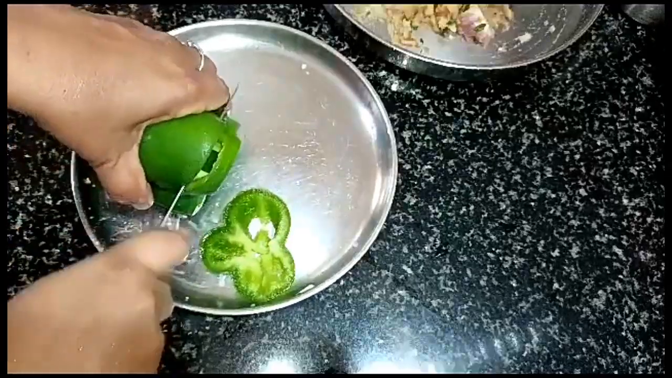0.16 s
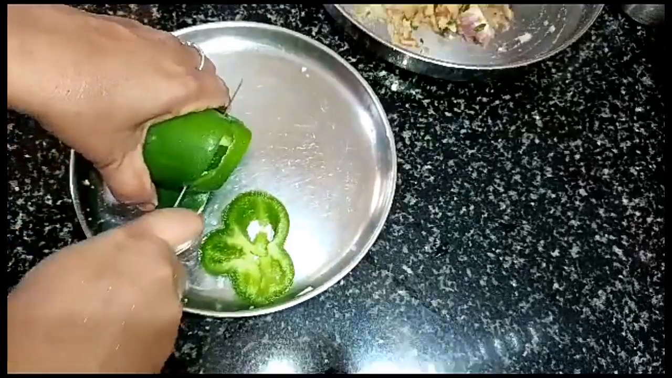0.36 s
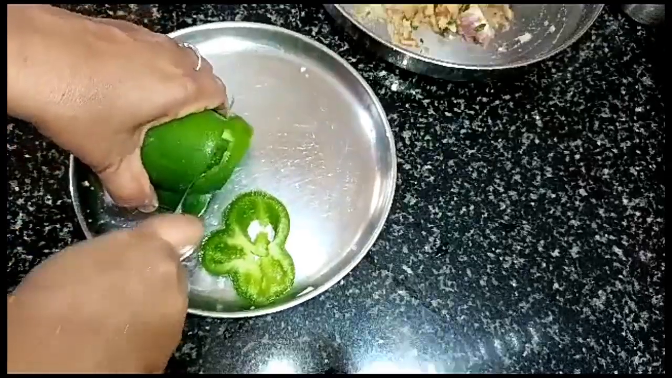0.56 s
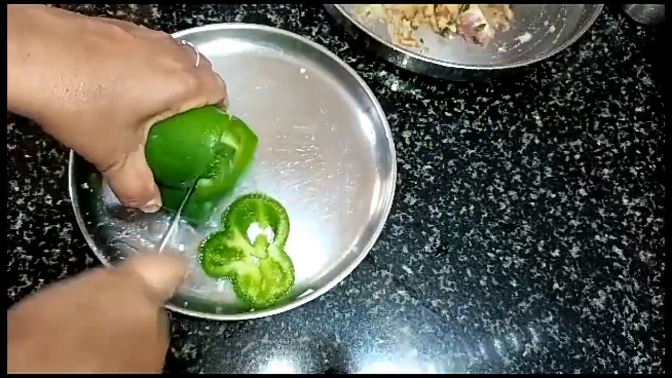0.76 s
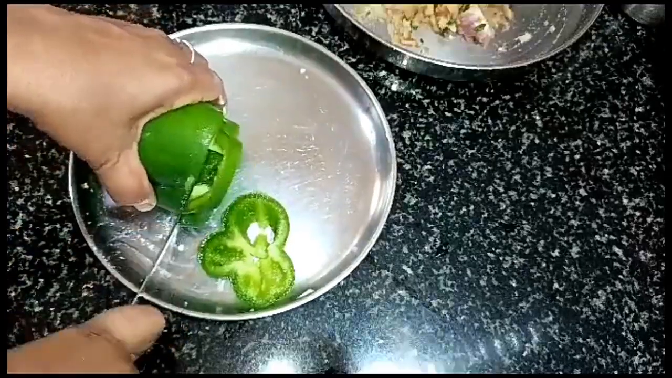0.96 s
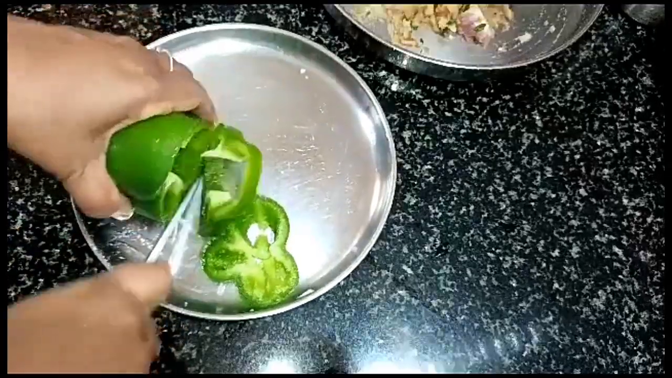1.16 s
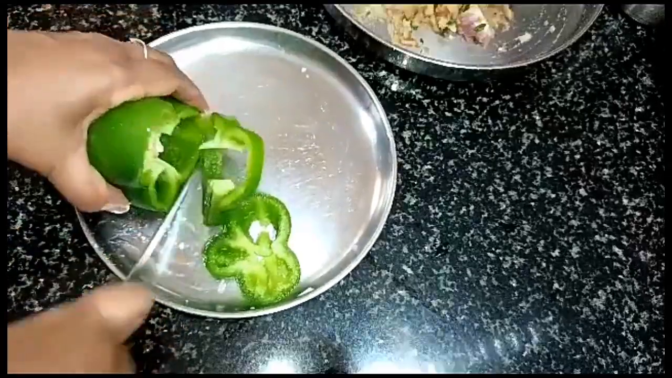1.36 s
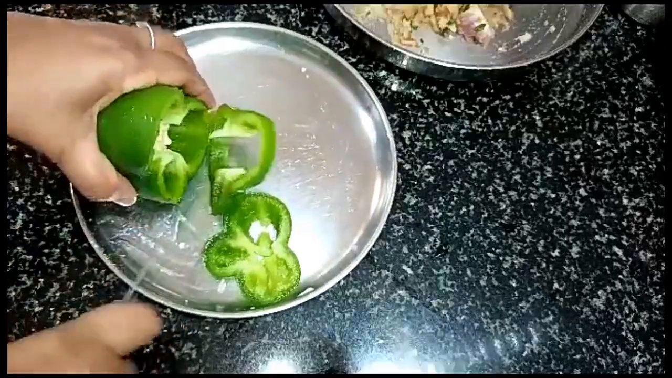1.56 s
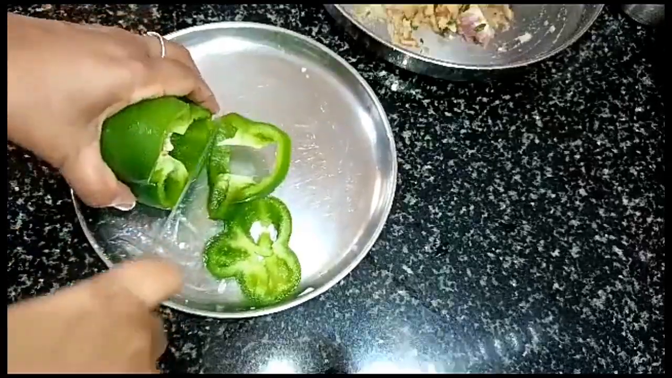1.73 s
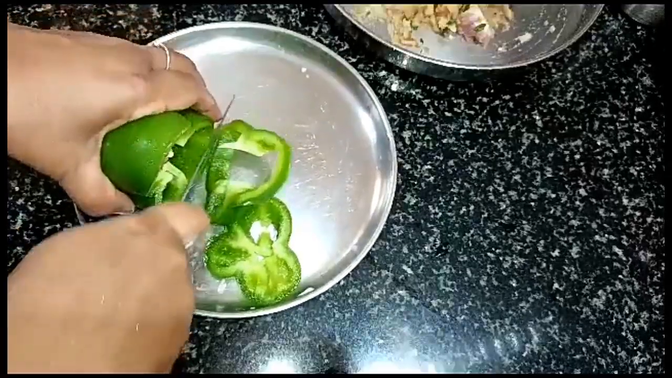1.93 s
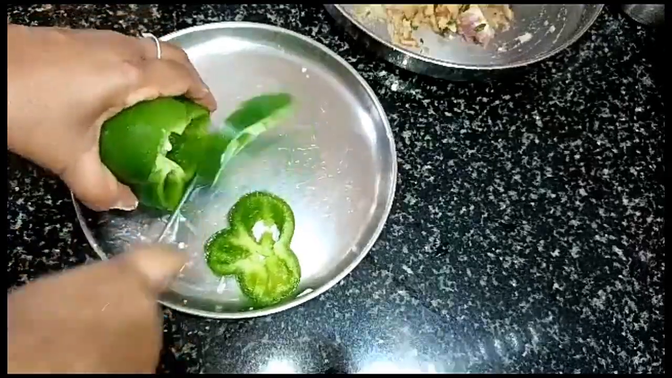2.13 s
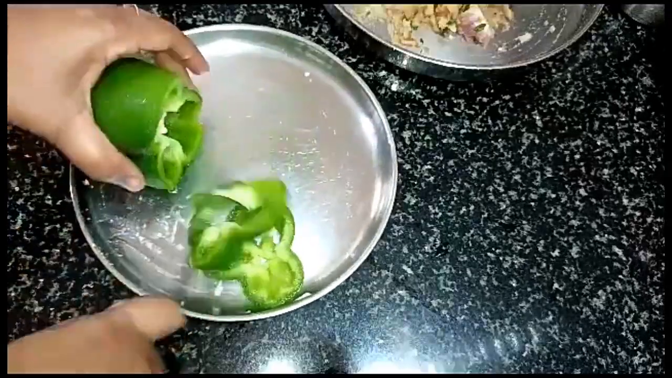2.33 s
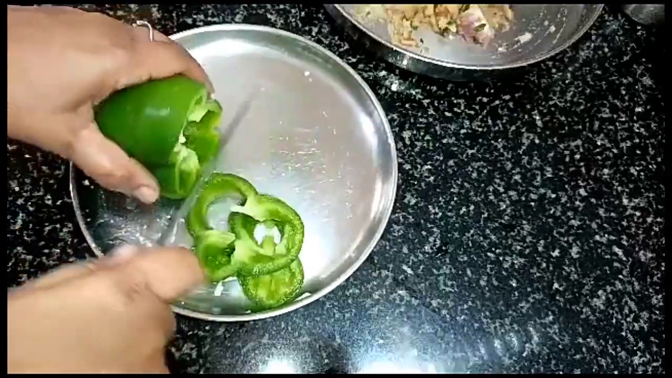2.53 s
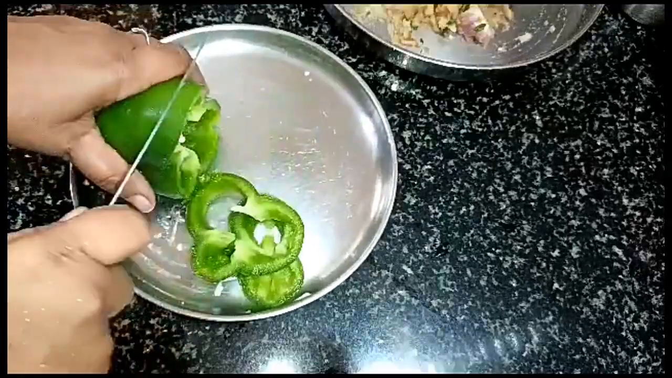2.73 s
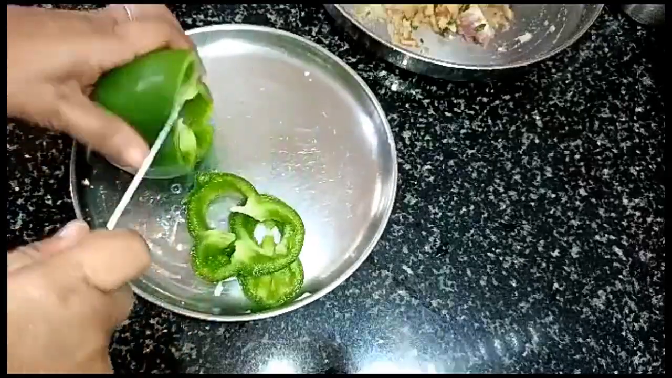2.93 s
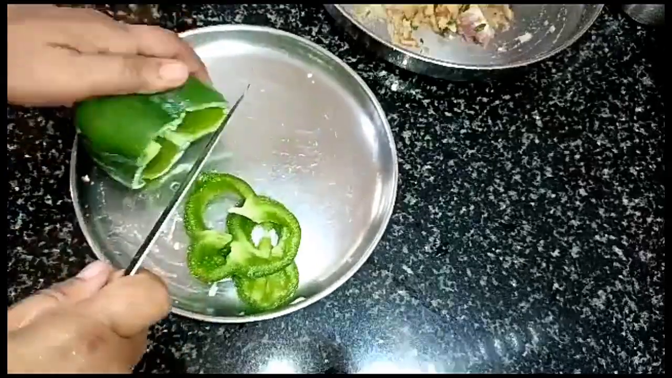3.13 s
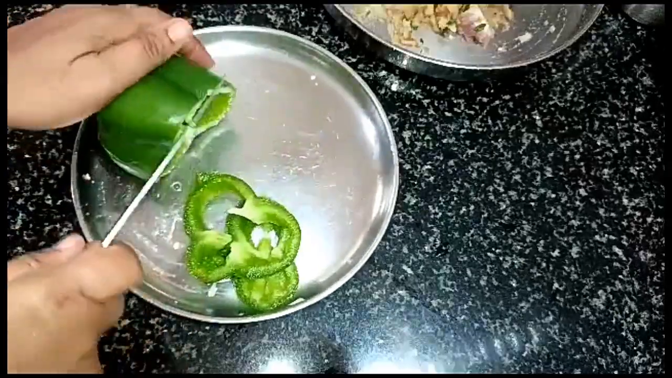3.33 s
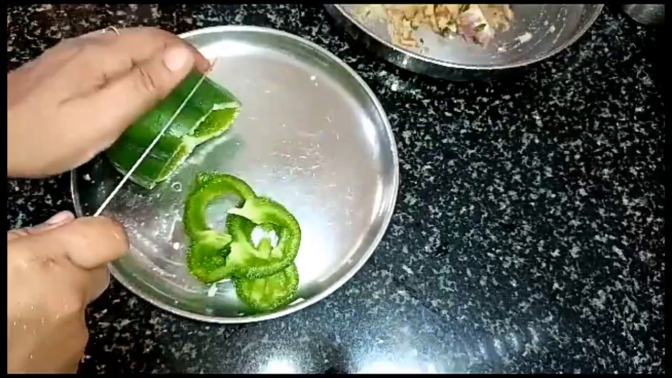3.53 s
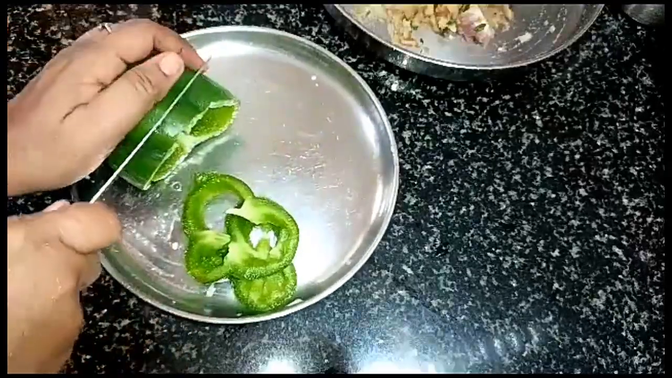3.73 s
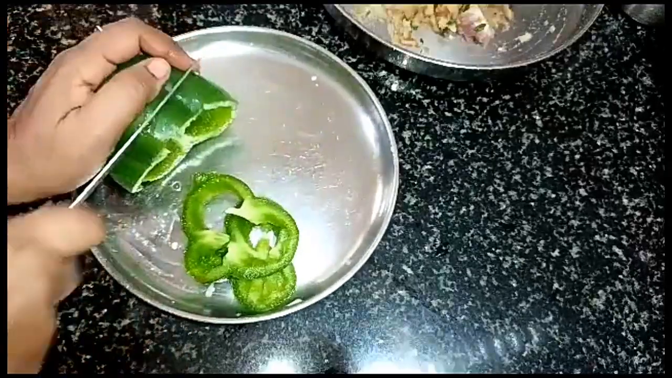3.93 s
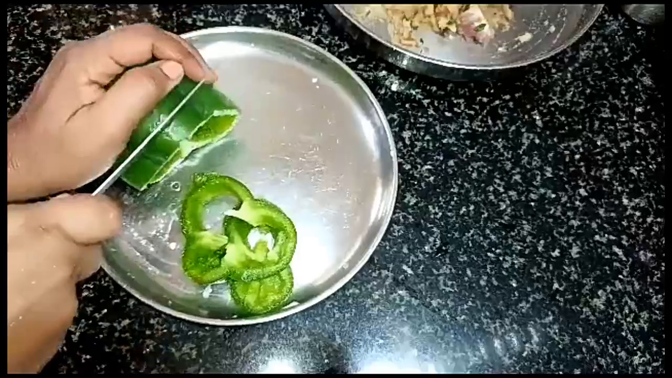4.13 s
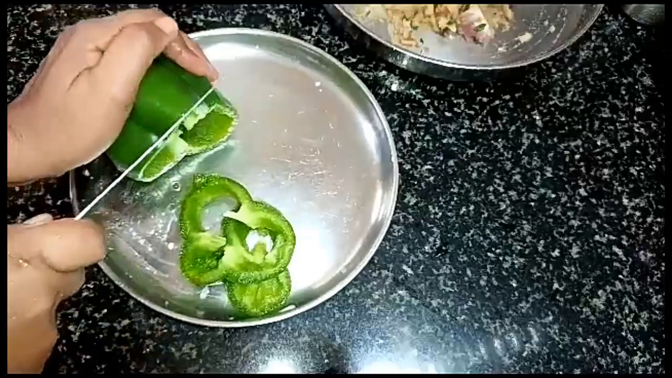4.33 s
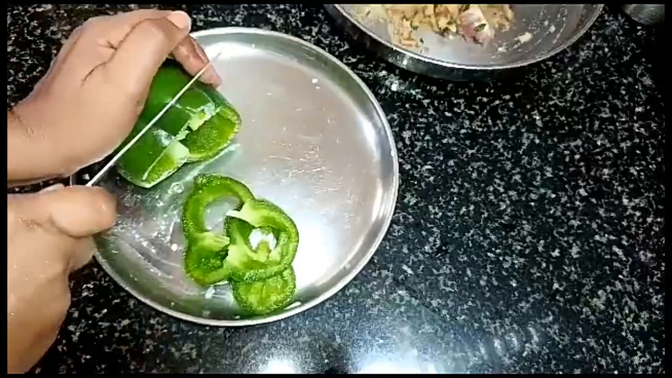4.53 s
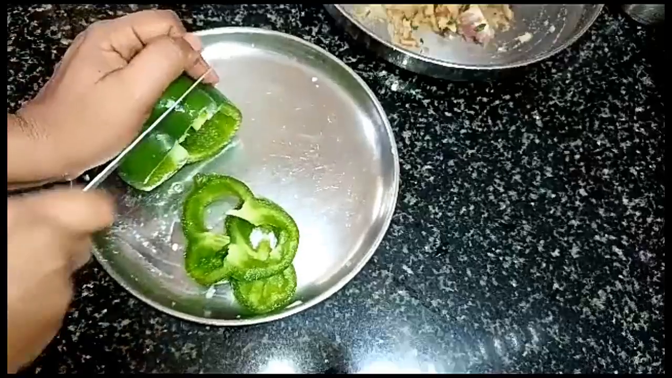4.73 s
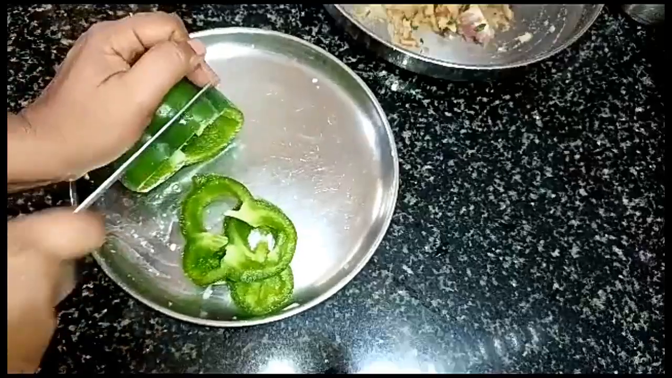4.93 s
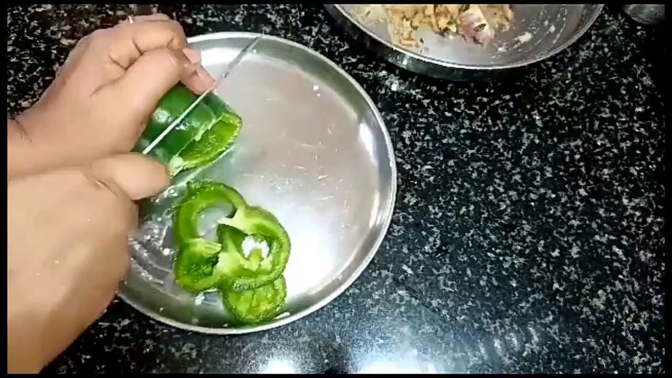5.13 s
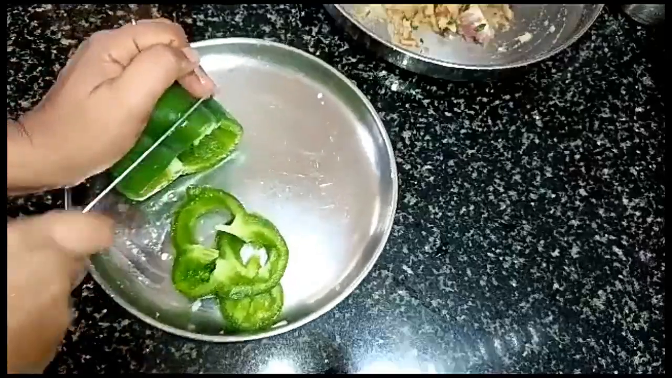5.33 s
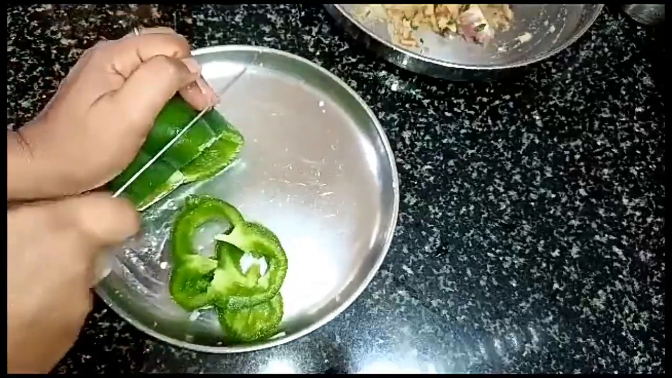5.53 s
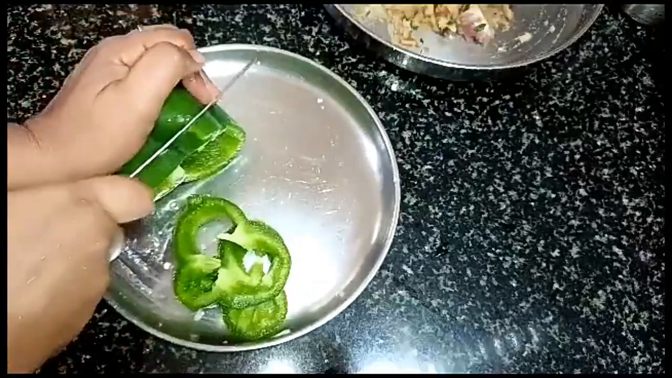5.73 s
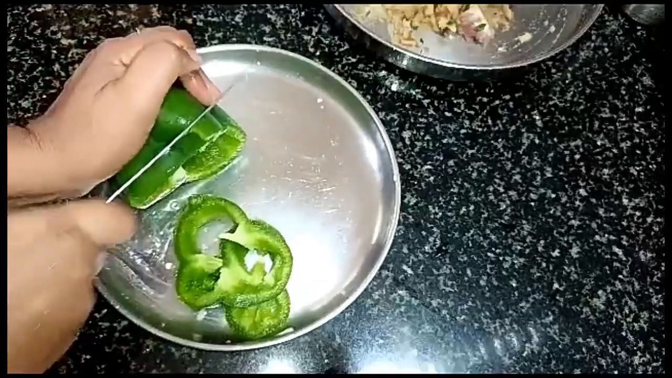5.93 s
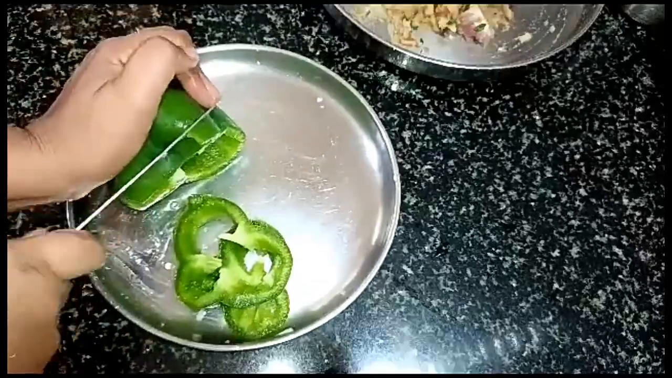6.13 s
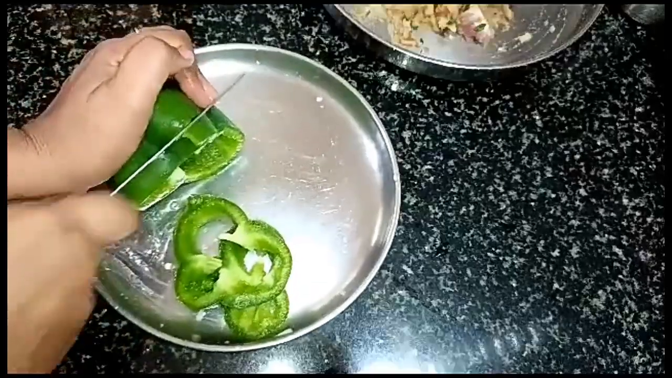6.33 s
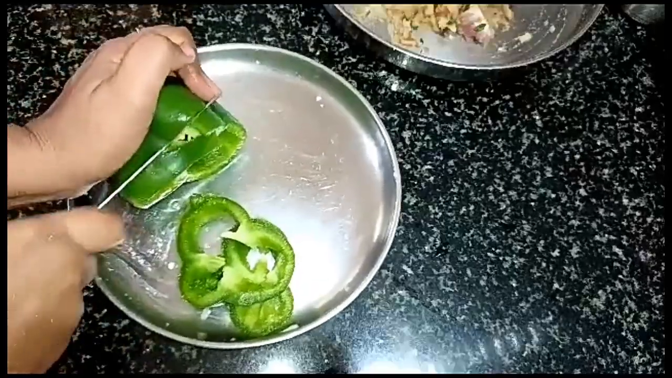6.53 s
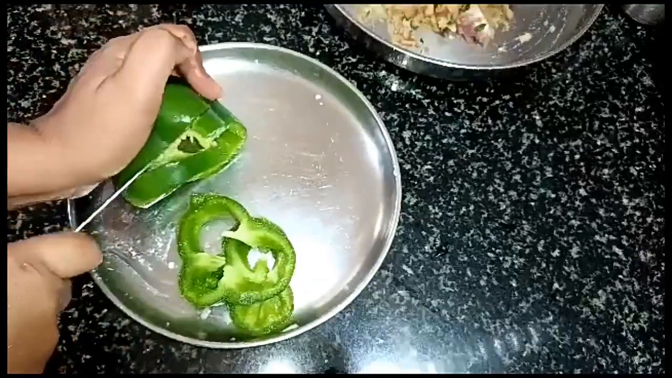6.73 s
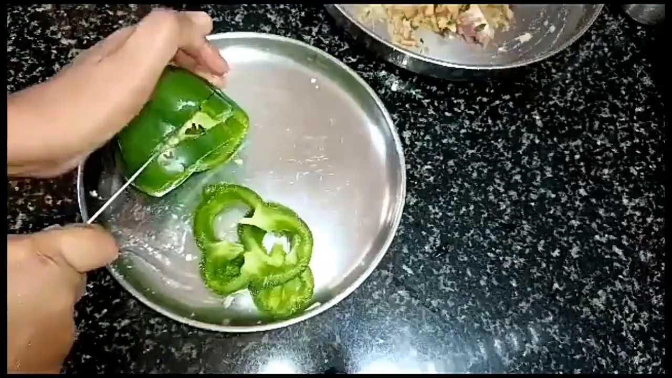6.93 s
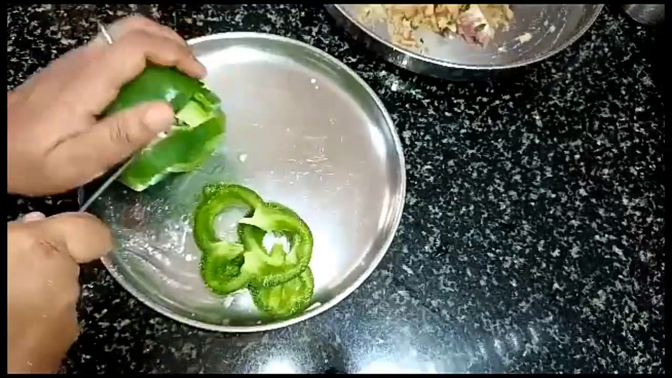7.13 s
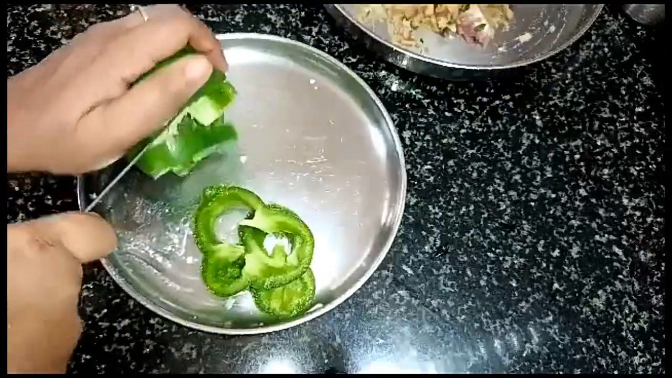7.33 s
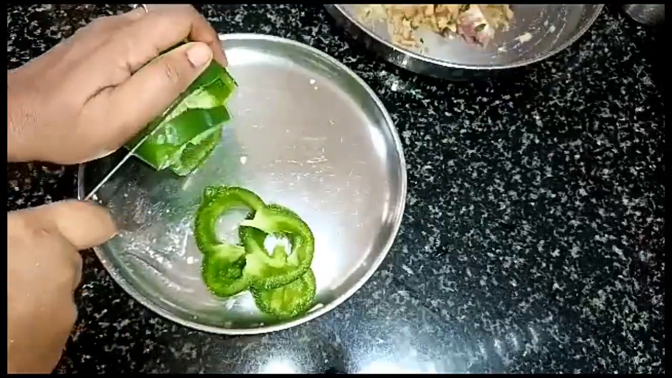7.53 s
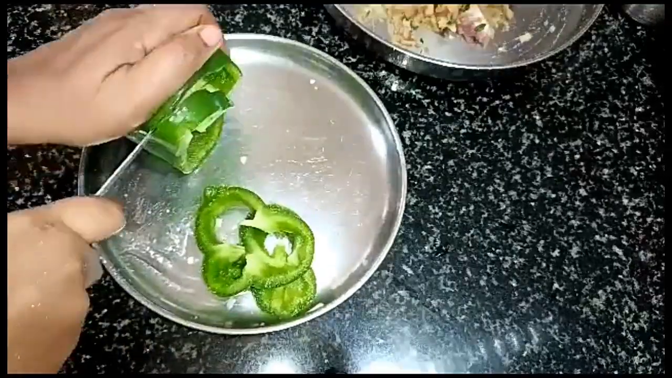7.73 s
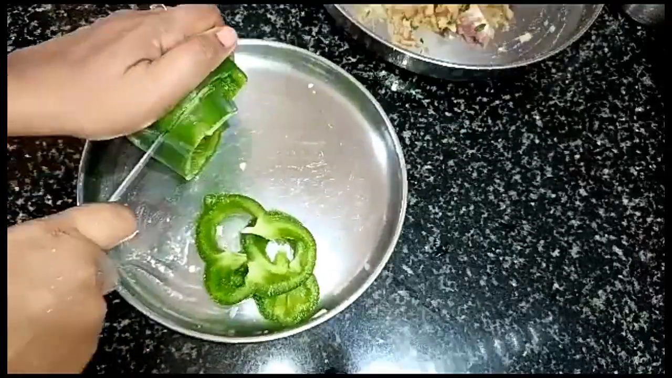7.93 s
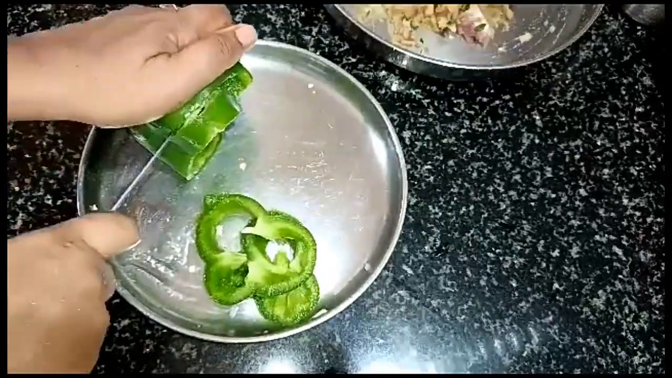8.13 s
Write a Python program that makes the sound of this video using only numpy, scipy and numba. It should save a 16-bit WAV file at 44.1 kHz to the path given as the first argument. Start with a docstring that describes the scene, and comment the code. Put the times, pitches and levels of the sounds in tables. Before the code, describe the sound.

A close stereo pickup in a hard, echoing kitchen, with faint wavering low hum and hiss held down by noise suppression that trims the tails. From 0 to 0.5 s a knife saws into a hollow pepper with short, gritty strokes. Between 0.5 and 1.05 s come loud, hollow, mid-pitched pops with crisp snaps, strongest near 1 s. Wet tearing continues, with light steel ticks at 1.3 and 1.67 s, the latter with a brief blade ring. At 2.28 s a hard, bright clink hits the plate with a dull knock and a crunchy rip. From about 2.7 to 5.2 s it is nearly quiet, only faint rubs and weak scrapes. A sharp crack at 5.47 s restarts the sawing: uneven crunches and pops around 5.9 to 6.9 s, two small plate ticks near 7.1 s, then softer strokes, a faint squeaky rub from 7.6 s and final cracks near 8.1 s.

```python
"""A knife saws through a hollow bell pepper on a steel plate, in a hard, echoing kitchen.
The flesh tears in dense random grains that hiss and excite two cavity resonances; cracks are damped sines with
noise snaps. Taps ring steel modes, knocks are noise bursts, rubs are gliding resonances, and a faint hum wavers.
Shaped noise makes the echoes and the room hiss. Two microphone ports of unlike colour listen, and a
noise suppressor holds the room noise down and cuts the tails."""
import sys
import numpy as np
from scipy import signal
from scipy.fft import rfft, irfft, next_fast_len
from scipy.io import wavfile
from scipy.ndimage import uniform_filter1d
from numba import njit

SR = 44100
rng = np.random.default_rng(int(sys.argv[2]) if len(sys.argv) > 2 else 0)


def unload_wav(signal):
    """Save mono or channel-first audio to the path in sys.argv[1] as 16-bit WAV at rate SR, clipped to [-1, 1]."""
    wavfile.write(
        sys.argv[1],
        SR,
        np.round(np.clip(np.atleast_2d(signal).T, -1, 1) * 32767).astype(np.int16),
    )


N = 360738   # samples


def from_db(db):
    """Logarithmic level law: decibels to amplitude gain."""
    return 10 ** (np.asarray(db) / 20)


def rms_one(x):
    """Energy normalisation: scale to a root-mean-square of 1."""
    return x / np.sqrt(np.mean(x ** 2) + 1e-20)


def in_time(rows):
    """Linear interpolation: table columns, after the time in seconds, as one value per sample."""
    s, *columns = np.transpose(rows)
    return [np.interp(np.arange(N) / SR, s, column) for column in columns]


def at_hz(points, hz):
    """Logarithmic frequency scale: read a spectrum in dB between its points."""
    points = np.array(points)
    return np.interp(np.log(hz + 1), np.log(points[:, 0]), points[:, 1])


def colour(x, spectrum, share=1):
    """Minimum-phase filtering: a folded cepstrum gives a spectrum in dB its causal response."""
    size = next_fast_len(N + 8192)
    log_gain = share * at_hz(spectrum, np.fft.rfftfreq(4096, 1 / SR)) * np.log(10) / 20
    cepstrum = irfft(log_gain)
    cepstrum[1:2048] *= 2
    cepstrum[2049:] = 0
    response = irfft(np.exp(rfft(cepstrum)))
    return irfft(rfft(x, size) * rfft(response, size), size)[..., :N]


def dying(t60, rise_s=0.00015):
    """Exponential decay: a 50 ms envelope with a quick rise."""
    t = np.arange(SR // 20) / SR
    return from_db(-60 * t / t60) * (1 - np.exp(-t / rise_s))


def add(out, s, sound):
    """Superposition: mix a sound in at a time in seconds."""
    at = round(s * SR)
    out[at:at + len(sound)] += sound[:N - at]


def ringing(modes, level_db):
    """Modal decay: a sum of damped sines, half a second long."""
    t = np.arange(SR // 2) / SR
    return sum(from_db(level_db + db - 60 * t / t60) * np.sin(2 * np.pi * hz * t) for hz, db, t60 in modes)


@njit
def moving_resonance(x, hz, r, sr):
    """Two-pole resonance: pole radius r sets the damping while the centre follows hz."""
    y = np.zeros(len(x))
    for i in range(2, len(x)):
        y[i] = x[i] - x[i - 2] + 2 * r * np.cos(2 * np.pi * hz[i] / sr) * y[i - 1] - r * r * y[i - 2]
    return y


GRAINS_PER_S = 2000   # mean rate


def grains(spread_db, clump_db=7.0, clump_hz=45):
    """Random impulse process: cells burst in clumps, a few much louder than the rest; rms 1."""
    slow = signal.lfilter(*signal.butter(2, clump_hz, fs=SR), rng.standard_normal(N))
    clumps = from_db(clump_db * rms_one(slow))
    sizes = from_db(spread_db * np.minimum(rng.exponential(1, N), 4)) * rng.choice([-1, 1], N)
    bursts = rng.random(N) < GRAINS_PER_S / SR
    return rms_one(clumps * sizes * bursts)


# Strokes of the blade. Each row: bite in seconds, peak level in dB before the port gain, length in seconds.
STROKES = [(0.0, -42, 0.099), (0.103, -58, 0.31), (0.254, -34.5, 0.075), (0.368, -38.5, 0.094),
           (0.513, -37, 0.17), (0.648, -45, .115), (0.798, -27.5, 0.1), (1.003, -37.5, 0.68),
           (1.346, -40, 0.41), (1.613, -38.5, 0.28), (1.668, -32.5, 0.077), (2.128, -62.5, .1),
           (2.253, -30.5, .06), (2.331, -26, 0.24), (2.997, -62.5, 0.26), (3.39, -62, 0.19),
           (3.882, -56.5, 0.15), (4.101, -54.5, 0.17), (4.356, -54.5, 0.21), (4.56, -69, .25),
           (5.007, -60.5, 0.49), (5.165, -52, 0.21), (5.336, -46, 0.23), (5.48, -27, 0.05),
           (5.596, -44, 0.23), (5.767, -52.5, 0.29), (5.946, -35.5, 0.14), (6.046, -48.5, .15),
           (6.176, -39.5, 0.23), (6.459, -50, 0.33), (6.658, -39, 0.28), (6.787, -49.5, 0.24),
           (6.943, -40.5, 0.34), (7.519, -40, 0.31), (7.754, -52.5, 1), (7.94, -39.5, 0.15)]
# A stroke swells over this share of its length and dies over the rest, by this range.
SWELL_SHARE, STROKE_RANGE_DB = 0.4, 28.5


def strokes():
    """Exponential growth and decay: steady rates in dB about each bite; overlaps add in power."""
    t, power = np.arange(0, N + 64, 64) / SR, 0
    for s, peak_db, length in STROKES:
        away = np.maximum((s - t) / SWELL_SHARE, (t - s) / (1 - SWELL_SHARE)) / length
        power = power + from_db(2 * (peak_db - STROKE_RANGE_DB * away))
    return np.interp(np.arange(N) / SR, t, np.sqrt(power))


# How the cut sounds as it deepens. Each row: time in seconds, cavity level in dB and wet hiss level in dB
# (both relative to the duller tearing), cavity pitch in Hz before it wanders.
CUT_PROGRESS = [(0, 20.5, 16.5, 1006), (.3, 10.5, 0, 1065), (.7, -13, -9, 1163), (1.02, 1.5, -6.5, 1206),
                (1.35, 8, -1.5, 1688), (1.7, -9, 0.5, 1808), (2.3, -7.5, 1, 1699), (3.0, -1, 6, 1454),
                (4.6, -7.5, 10, 1500), (5.0, -10, -12, 1342), (5.5, 4, 0, 998), (6.1, 9.5, 6, 1129),
                (6.5, -15, -11, 1257), (6.9, 7, -2.5, 1106), (7.5, -15.5, 6, 1347), (7.62, 3, -15, 880),
                (7.8, 6.5, -6, 1150), (8.18, 29, -7.5, 1171)]
# Spectrum of tearing flesh. Each row: frequency in Hz, relative density in dB per Hz.
TEARING_SPECTRUM = [(450, -29.5), (750, -18.5), (1500, 0), (2800, -0.5), (4200, -11.5), (5300, -8.5),
                    (8200, -26), (11200, -14.5), (12100, -9), (14500, -14)]
CAVITY_WIDTH_HZ, SECOND_MODE = 474, 1.95   # lower mode's pole bandwidth; pitch ratio of upper mode to lower
UPPER_DB, UPPER_LOSS = -0.5, 0.12   # upper mode re the lower; it loses this share of the cavity's own rise
WANDER_HZ, WANDER_OCTAVES = 7, 0.1   # the cavity's pitch wanders as the hand squeezes the pepper
# Tearing below this edge fades as the cavity's pitch rises above it, over one octave at most.
LOW_EDGE_HZ, LOW_DB_PER_OCTAVE = 1310, 46.5


def sawing():
    """Cavity resonance: bursting cells hiss directly and excite two modes of the air within."""
    cavity_db, bright_db, hz = in_time(CUT_PROGRESS)
    wander = rms_one(signal.lfilter(*signal.butter(2, WANDER_HZ, fs=SR), rng.standard_normal(N)))
    hz = hz * 2 ** (WANDER_OCTAVES * wander)
    upper_db = UPPER_DB - UPPER_LOSS * cavity_db

    tear = colour(grains(spread_db=1.5), TEARING_SPECTRUM)
    dull, bright = (rms_one(signal.sosfilt(signal.butter(4, 9500, kind, fs=SR, output="sos"), tear))
                    for kind in ("low", "high"))
    # The same section twice on each side of the low edge.
    deep, upper = (signal.sosfilt(signal.butter(2, LOW_EDGE_HZ, kind, fs=SR, output="sos")[[0, 0]], dull)
                   for kind in ("low", "high"))
    deep_loss_db = LOW_DB_PER_OCTAVE * np.clip(np.log2(hz / LOW_EDGE_HZ), 0, 1)
    dull = upper + from_db(-deep_loss_db) * deep

    burst, r = grains(spread_db=2.5), np.exp(-np.pi * CAVITY_WIDTH_HZ / SR)
    lower_mode = moving_resonance(moving_resonance(burst, hz, r, SR), hz, r * r, SR)   # twice, for steep skirts
    upper_mode = moving_resonance(burst, SECOND_MODE * hz, r, SR)
    cavity = rms_one(lower_mode) + from_db(upper_db) * rms_one(upper_mode)

    mix = np.sqrt(1 + from_db(2 * bright_db) + from_db(2 * cavity_db))   # the stroke's level is for the whole mix
    return strokes() / mix * (dull + from_db(bright_db) * bright + from_db(cavity_db) * cavity)


# Decay of the kitchen's echoes. Each row: band centre in Hz, reverberation time t60 in seconds.
KITCHEN_DECAY = [(300, 0.17), (700, 0.74), (1500, 0.57), (3000, 0.59), (6000, 0.57), (12000, 0.45)]
KITCHEN_DB, TAIL_RISE_S = -3, 0.0084   # tail energy re direct sound; time over which it builds up
COUNTER_DB, COUNTER_T60_S = -8, 0.025   # reflections off plate and counter


def kitchen(x):
    """Diffuse reverberation: close reflections, then noise that dies band by band."""
    t, tail = np.arange(SR) / SR, 0
    for hz, t60 in KITCHEN_DECAY:
        edges_hz = [hz / np.sqrt(2), min(hz * np.sqrt(2), 17000)]
        band = signal.butter(2, edges_hz, "band", fs=SR, output="sos")
        tail = tail + signal.sosfilt(band, rng.standard_normal((2, SR))) * from_db(-60 * t / t60)
    tail = tail * np.clip(t / TAIL_RISE_S, 0, 1) ** 2
    close = rng.standard_normal((2, SR)) * from_db(-60 * t / COUNTER_T60_S) * (t > .0015)
    echoes = from_db(KITCHEN_DB) * rms_one(tail) + from_db(COUNTER_DB) * rms_one(close)
    low, high = (signal.butter(1, 600, kind, fs=SR) for kind in ("low", "high"))
    echoes = signal.lfilter(*low, echoes[0]) + signal.lfilter(*high, echoes)   # long waves reach both ports alike
    return signal.fftconvolve(x[None], echoes / np.sqrt(SR), axes=1)[:, :N]


# Bands of the far hum. Each row: centre in Hz, width in Hz, relative level in dB.
HUM_BANDS = [(106.7, 13, 10.5), (146.6, 8.6, 7.5)]
# Wavering of the hum. Each row: time in seconds, overall level in dB before the suppressor.
HUM_LEVEL = [(0, -64), (.8, -61), (1.1, -72), (2.8, -65.5), (4.0, -70), (5.7, -79.5), (7.4, -70.5),
             (7.9, -66.5)]


def hum():
    """Narrow-band noise: a far hum in a few bass bands wavers, nearly alike in both ears."""
    white = rng.standard_normal(N) + .4 * rng.standard_normal((2, N))
    bands = (from_db(db) * rms_one(signal.lfilter(*signal.iirpeak(hz, hz / width, fs=SR), white))
             for hz, width, db in HUM_BANDS)
    return from_db(in_time(HUM_LEVEL)[0]) * rms_one(sum(bands))


# Room hiss before the suppressor's depth is added. Each row: frequency in Hz, relative density in dB per Hz.
HISS_SPECTRUM = [(40, -1), (155, -12.5), (300, -14.5), (1100, -25.5), (2800, -28.5), (8000, -43.5),
                 (11300, -37.5), (12300, -39), (14500, -42)]
# Full depth of the noise suppressor. Each row: frequency in Hz, depth in dB.
SUPPRESSION_DEPTH = [(50, 11.5), (150, -1.5), (400, 17), (1000, 19), (3000, 9), (16000, 7.5)]
HISS_DB = -73   # before the suppressor's depth is added


def room_noise():
    """Partial coherence: steady hiss shares its bass between the ears; raised by the suppressor's depth."""
    own, shared = rng.standard_normal((2, N)), rng.standard_normal(N)
    low, high = (signal.butter(1, 400, kind, fs=SR) for kind in ("low", "high"))
    white = signal.lfilter(*low, 0.5 * shared + 0.23 * own) + signal.lfilter(*high, own)
    hiss = from_db(HISS_DB) * colour(rms_one(colour(white, HISS_SPECTRUM)), SUPPRESSION_DEPTH)
    return hiss + hum()


# Cracks of the flesh. Each row: start in seconds, cavity pop level in dB before the port gain,
# cavity pitch in Hz, snap level in dB relative to the pop, before a common snap gain and colour.
CRACKS = [(0.236, -42.5, 1100, -9.5), (0.363, -31.5, 1085, -15.5), (0.484, -24.5, 1190, -28),
          (0.507, -18, 1190, -46.5), (0.563, -16.5, 1145, -31.5), (0.645, -22, 1180, -20),
          (0.782, -23.5, 1130, -17), (0.832, -28, 1110, -12), (0.993, -14, 1241, -29),
          (1.016, -16, 1240, -24.5), (1.035, -20.5, 1180, -17), (1.056, -22, 1886, -6.5),
          (4.092, -56, 2580, 4), (5.463, -17, 1217, -26), (5.584, -28.5, 852, -17.5),
          (5.884, -20.5, 1246, -25.5), (5.951, -22, 1200, -20), (6.064, -25, 1106, -20),
          (6.179, -27, 950, -49), (6.422, -34, 1206, -20), (6.641, -32.5, 1000, -15),
          (6.803, -31.5, 2000, -17.5), (6.891, -36, 1150, -30), (7.49, -54, 1600, -6),
          (7.732, -31.5, 1990, -14.5), (7.95, -30.5, 1218, -30.5), (8.105, -51.5, 1660, 8.5),
          (8.144, -25, 1234, -24)]
POP_T60_S, POP_RISE_S, SNAP_T60_S = 0.011, 0.0008, 0.014
WALL_RATIO, WALL_DB = 0.7, -12   # the pepper's wall thuds below the pop: pitch and level re the pop


def cracks():
    """Impulse excitation: each crack is a short pop of the cavity with a bright snap on top."""
    pops, snaps = np.zeros(N), np.zeros(N)
    pop, snap = dying(POP_T60_S, POP_RISE_S), dying(SNAP_T60_S)
    noise = rng.standard_normal((len(CRACKS), len(snap)))
    for (s, pop_db, hz, snap_db), burst in zip(CRACKS, noise):
        turn = 2 * np.pi * hz * np.arange(len(pop)) / SR
        wall = from_db(WALL_DB) * np.sin(WALL_RATIO * turn)
        add(pops, s, from_db(pop_db) * pop * (np.sin(turn) + wall))
        add(snaps, s, from_db(pop_db + snap_db) * snap * burst)
    pops = signal.sosfilt(signal.butter(2, 420, "high", fs=SR, output="sos"), pops)
    return pops + from_db(27.0) * colour(snaps, TEARING_SPECTRUM)


# The pepper jolts against the plate. Each row: start in seconds, level in dB before the envelope and
# the port gain, band centre in Hz.
KNOCKS = [(0.563, -29, 780), (0.783, -34, 556), (1.328, -39, 503), (2.277, -33, 687), (5.951, -41, 456.7)]
KNOCK_T60_S = 0.03   # a dull crunch


def knocks():
    """Damped impact: each knock is a short burst of noise, an octave wide."""
    out, shape = np.zeros(N), dying(KNOCK_T60_S, POP_RISE_S)
    for (s, db, hz), draw in zip(KNOCKS, rng.standard_normal((len(KNOCKS), len(shape)))):
        band = signal.butter(2, [hz / np.sqrt(2), hz * np.sqrt(2)], "band", fs=SR, output="sos")
        add(out, s, from_db(db) * shape * rms_one(signal.sosfilt(band, draw)))
    return out


FLEX_HZ, FLEX_T60_S, KNOCK_FLEX_DB = 339, .45, -25   # flexing of the whole plate; its level re the knock


def flexing():
    """Low plate mode: the whole plate's flexing swells in after knocks and taps."""
    out, swell = np.zeros(N), np.clip(np.arange(SR // 2) / SR / 0.014, 0, 1)
    from_knocks = [(s, db + KNOCK_FLEX_DB) for s, db, _ in KNOCKS]
    from_taps = [(s, tick_db + flex_db) for s, tick_db, _, flex_db in TAPS]
    for s, db in from_knocks + from_taps:
        add(out, s, swell * ringing([(FLEX_HZ, 0, FLEX_T60_S)], db))
    return out


# Blade on plate. Each row: start in seconds, tick peak in dB before the high-pass and the port gain,
# plate ring in dB and plate flexing in dB (both relative to the tick; the flexing takes no port gain).
TAPS = [(1.3276, -18.5, -11, -44.5), (1.6659, -17.5, -16.5, -51), (2.277, -3.5, -12, -33.5),
        (7.1039, -21.5, -14, -42), (7.1632, -23.5, -14, -46)]
# Plate modes, damped by the food on it. Each row: frequency in Hz, mean relative level in dB, t60 in seconds.
PLATE_MODES = [(1650, 0, .025), (2400, -4, .022), (3000, -1, .02), (4000, -4, .015), (5163, -11, .03)]
# Blade modes. Each row: frequency in Hz, relative level in dB, t60 in seconds.
BLADE_MODES = [(2670, -6, .06), (3060, 0, .04), (3230, -2, .06)]
BLADE_FREED_S, BLADE_FREED_DB = 1.668, -24.5   # the blade springs free and rings
CLATTER_DB, CLATTER_T60_S = -6, .018   # the blade chatters on after the first touch: decaying noise re the tick


def plate():
    """Modal impact: a sharp tick of steel on steel sets off the plate's modes; the freed blade rings."""
    out, tick = np.zeros(N), dying(0.0017) + from_db(CLATTER_DB) * dying(CLATTER_T60_S)
    noise = rng.standard_normal((len(TAPS), len(tick)))
    for (s, tick_db, ring_db, _), draw in zip(TAPS, noise):
        contact = tick * draw
        contact[1] += 3.0   # the first touch is one hard click
        bright = signal.lfilter(*signal.butter(2, [1200, 6500], "band", fs=SR), contact)
        # The port's narrow treble resonance near 12 kHz brightens the tick.
        port_treble = signal.lfilter(*signal.butter(1, [11500, 14500], "band", fs=SR), contact)
        bright += from_db(-1.5) * port_treble
        add(out, s, from_db(tick_db) * bright / abs(bright).max())
        struck = [(hz, db + rng.normal(0, 3), t60) for hz, db, t60 in PLATE_MODES]   # every tap lands elsewhere
        add(out, s, ringing(struck, tick_db + ring_db))
    add(out, BLADE_FREED_S, ringing(BLADE_MODES, BLADE_FREED_DB))
    # High-pass: keeps ticks and rings free of bass from their abrupt starts.
    return signal.sosfilt(signal.butter(4, LOW_EDGE_HZ, "high", fs=SR, output="sos"), out)


# Faint squeaky rubs. Each row: start in seconds, length in seconds (cut off at half a second),
# first pitch in Hz, last pitch in Hz, level in dB before the swell and the port gain.
RUBS = [(2.078, 0.13, 3020, 2780, -69.5), (2.991, 0.21, 2615, 2710, -68.5), (3.99, 0.11, 1854, 2080, -63.5),
        (4.149, 0.3, 1896, 1568, -59.5), (4.276, .1, 1007, 1138, -64.5), (7.29, 0.2, 2930, 3010, -63),
        (7.27, 0.23, 1960, 1940, -72), (7.64, 0.64, 2616, 2570, -50)]
RUB_WIDTH_HZ, RUB_SKEW = 170, .6   # pole bandwidth; a rub swells faster than it fades


def rubs():
    """Stick-slip friction: grains pass twice through a narrow gliding resonance, swelling and fading."""
    out, r = np.zeros(N), np.exp(-np.pi * RUB_WIDTH_HZ / SR)
    half_seconds = grains(spread_db=0.5)[:len(RUBS) * (SR // 2)].reshape(len(RUBS), -1)
    for (start, length, first_hz, last_hz, level_db), noise in zip(RUBS, half_seconds):
        u = np.clip(np.arange(SR // 2) / SR / length, 0, 1)   # progress; a rub is cut off after half a second
        hz = first_hz + (last_hz - first_hz) * u
        squeak = rms_one(moving_resonance(moving_resonance(noise, hz, r, SR), hz, r, SR))
        add(out, start, from_db(level_db) * np.sin(np.pi * u ** RUB_SKEW) ** 2 * squeak)
    return out


# Colour of the ports: gain of the left, loss of the right. Each row: frequency in Hz, gain in dB.
PORT_COLOUR = [(300, 0), (5000, 0.5), (9000, 7), (12500, -9), (16000, -2)]
PORT_GAIN_DB, LEFT_LAG = 2.5, 8   # gain for the near sounds; delay of their direct path at the left, in samples


def scene():
    """Superposition at two ports: near sounds with echoes and flexing, over the room noise."""
    near = from_db(PORT_GAIN_DB) * (sawing() + cracks() + knocks() + plate() + rubs())
    direct = np.stack([np.roll(near, LEFT_LAG), near])
    left, right = direct + kitchen(near) + flexing()
    ports = np.stack([colour(left, PORT_COLOUR, share=1), colour(right, PORT_COLOUR, share=-1)])
    return ports + room_noise()


def suppress(x, margin_db=5, memory=0.56):
    """Spectral subtraction: a bin's gain falls, to the full depth, as its power nears its quiet level."""
    hz, _, spec = signal.stft(x, SR, nperseg=1024)
    power = uniform_filter1d(np.mean(abs(spec) ** 2, axis=0), size=9, axis=0)
    smoothed = signal.lfilter([1 - memory], [1, -memory], power, axis=1)
    power = np.maximum(power, smoothed)   # rises at once, falls slowly
    quiet = np.percentile(power[:, ::4], 10, axis=1, keepdims=True) * from_db(2 * margin_db)
    floor = from_db(-at_hz(SUPPRESSION_DEPTH, hz))[:, None]
    gain = np.maximum(1 - quiet / (power + 1e-20), floor)
    return signal.istft(spec * gain, SR, nperseg=1024)[1][:, :N]


CUTOFF_HZ = 16100


def record(dry):
    """Band limiting and clipping: bass roll-off, suppressor, overload at full scale, steep top cut."""
    x = suppress(signal.sosfilt(signal.butter(6, 46, "high", fs=SR, output="sos"), dry))
    return signal.sosfilt(signal.cheby2(16, 60, CUTOFF_HZ, fs=SR, output="sos"), np.clip(x, -1, 1))


dry = scene()
out = record(dry)
unload_wav(out)
```